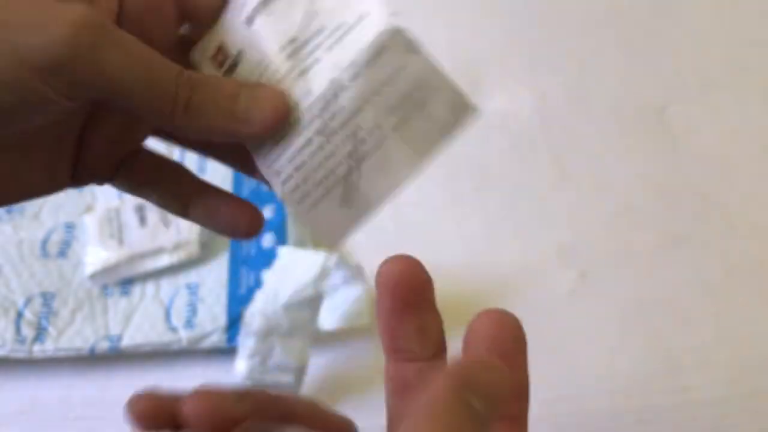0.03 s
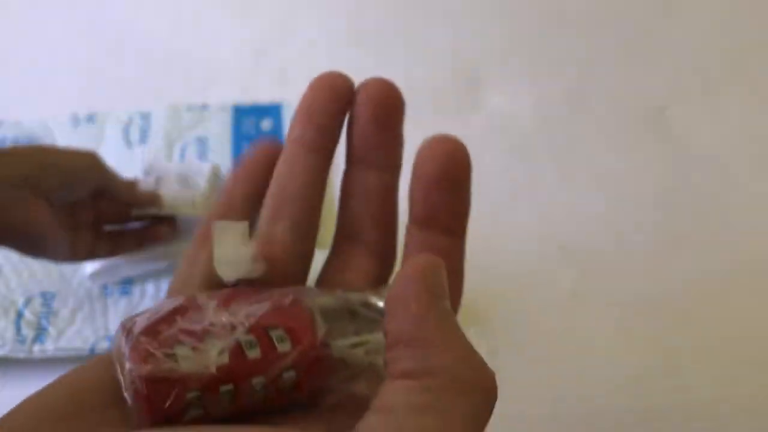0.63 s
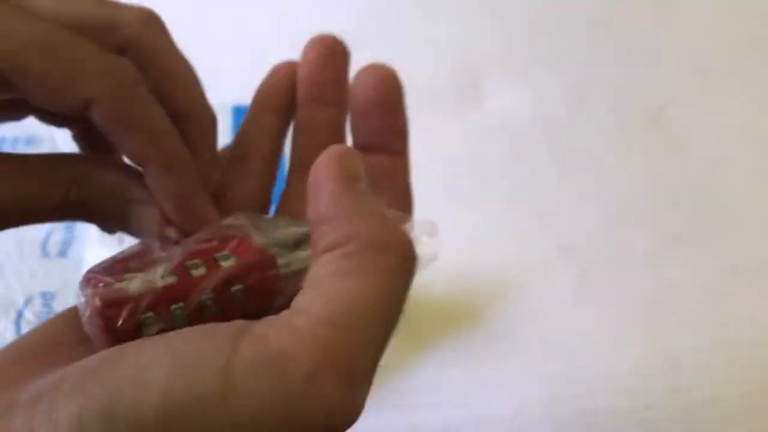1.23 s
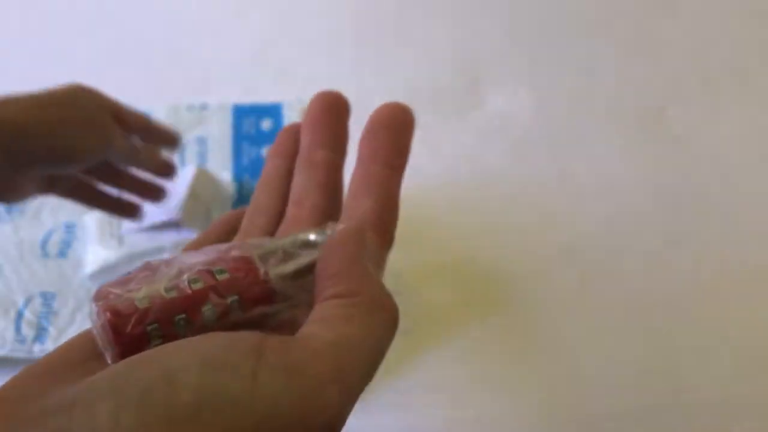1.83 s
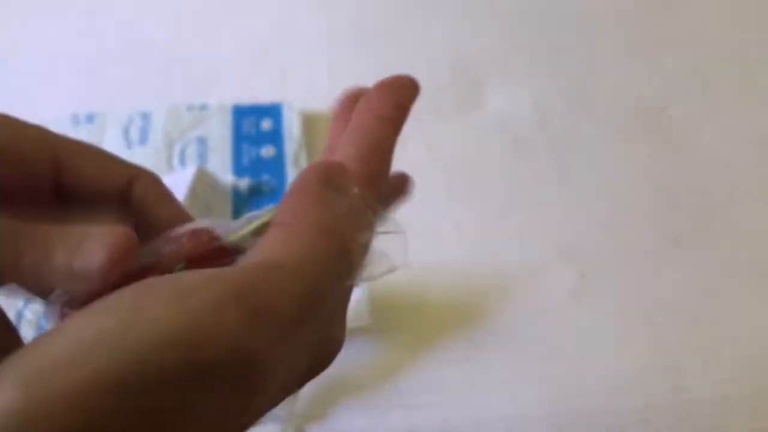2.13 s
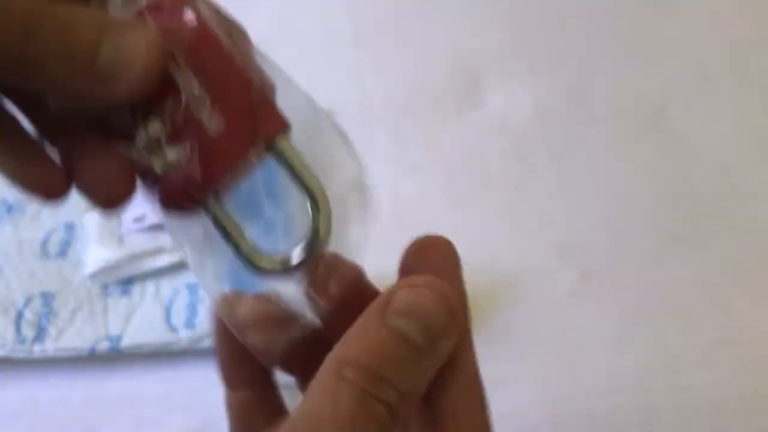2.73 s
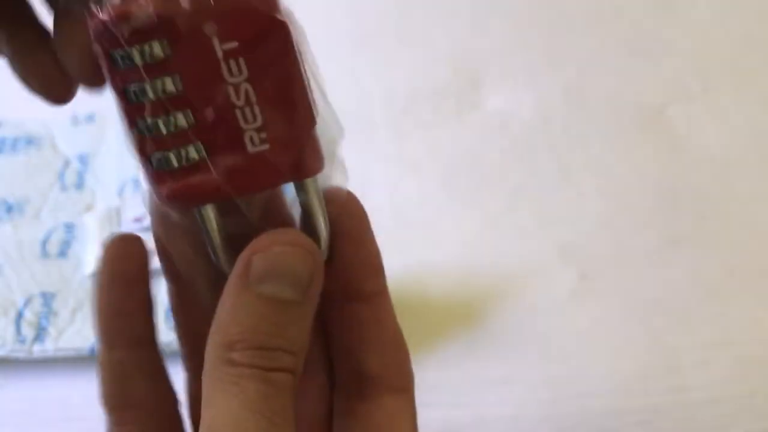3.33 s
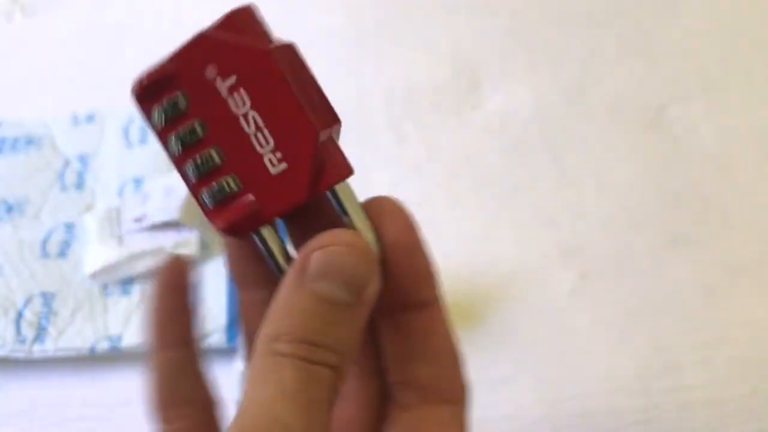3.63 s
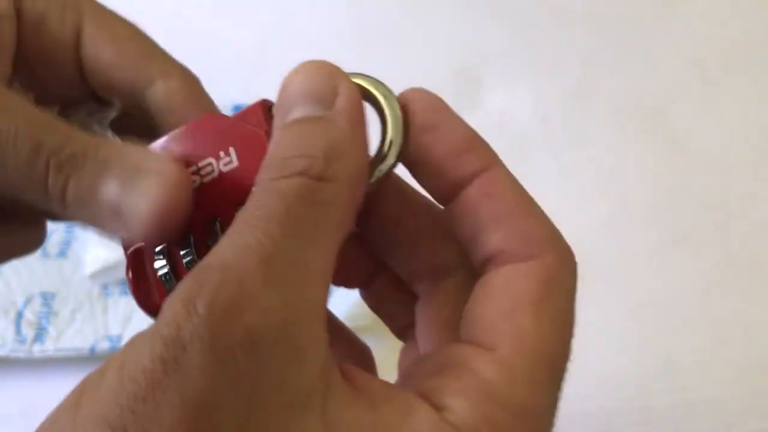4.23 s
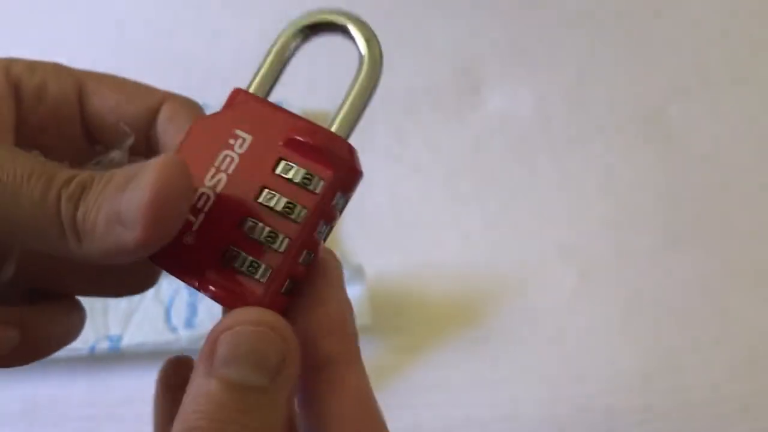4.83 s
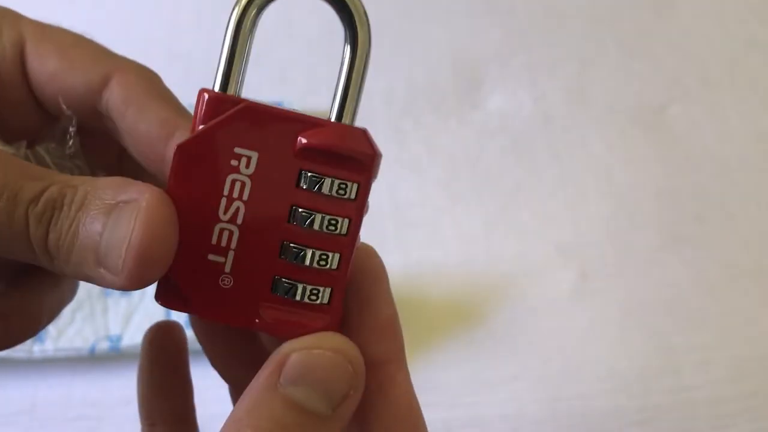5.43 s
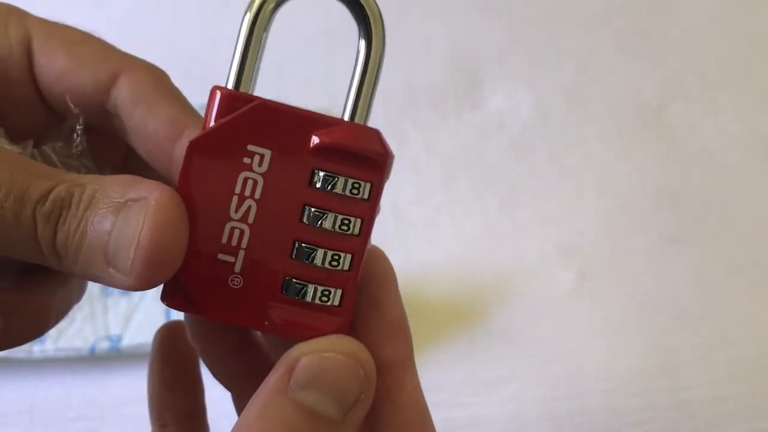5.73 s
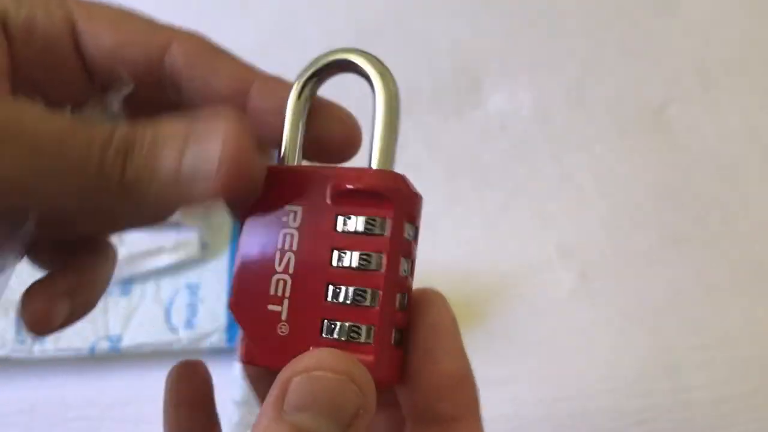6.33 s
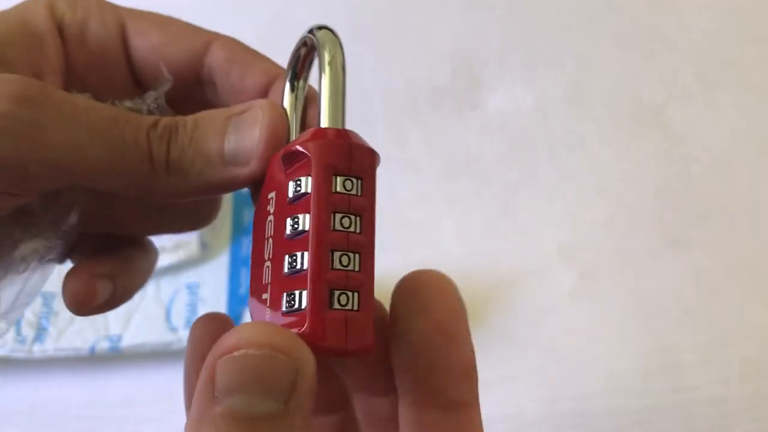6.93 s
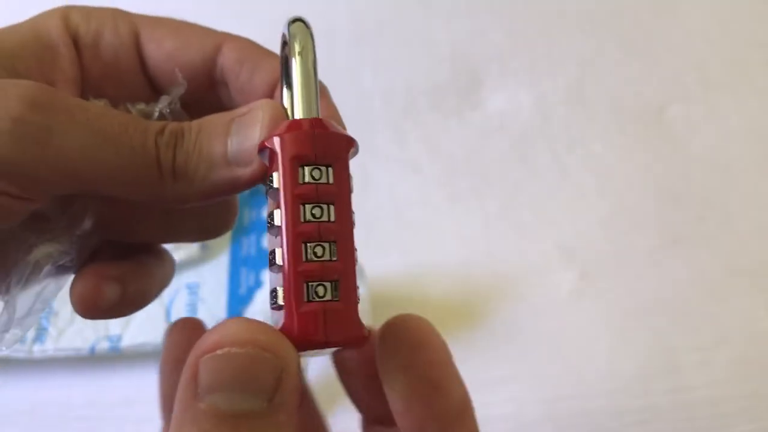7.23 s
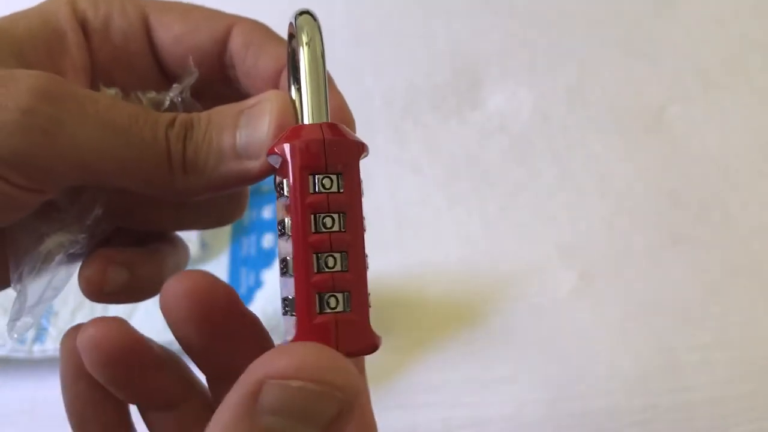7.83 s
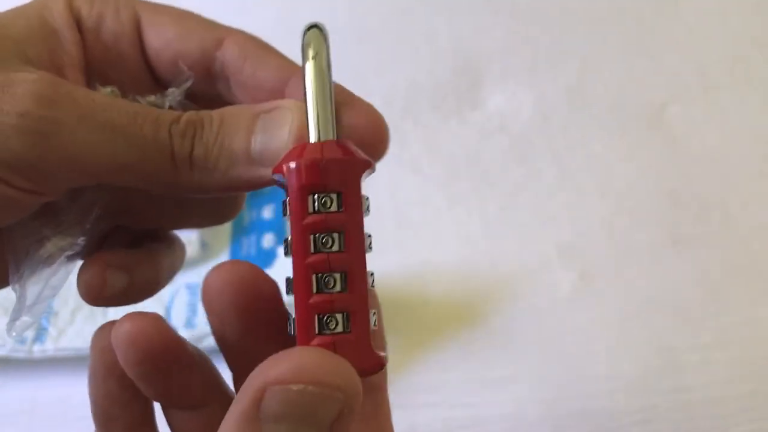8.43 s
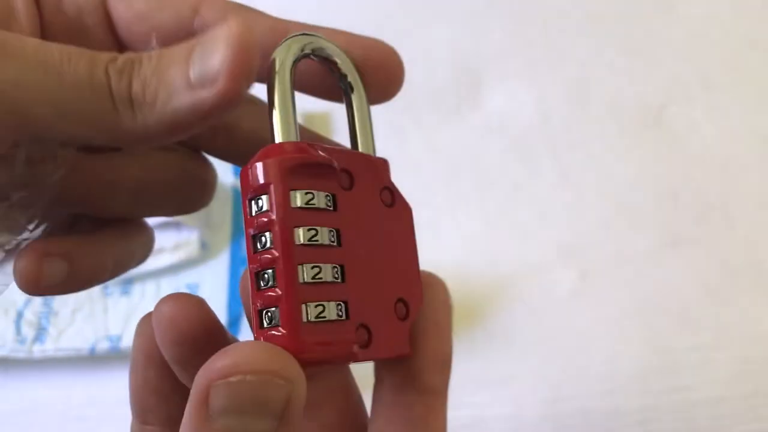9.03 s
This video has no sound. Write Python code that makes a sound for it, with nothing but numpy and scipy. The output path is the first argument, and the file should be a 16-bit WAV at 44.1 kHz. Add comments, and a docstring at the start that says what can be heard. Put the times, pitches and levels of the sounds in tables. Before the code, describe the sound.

Thin plastic crackles in short bursts close to the microphone, just above a table. The crinkling grows thicker and louder as hands tug the wrapping off a padlock, then dies down as it is balled up in one hand. Sparse, quieter crackles, light clicks of the lock and soft finger taps follow while the lock is handled, over the faint low background of a small room.

```python
"""A small quiet room, microphone close above a table: hands pull a thin plastic wrapper off a padlock.
The film buckles in swarms of tiny creases, densest while it slides off the lock; afterwards it crackles
now and then in the fist while fingers turn the lock over. Large creases snap, the lock ticks, fingertips
knock softly. The table gives each snap a quick echo; faint walls and a low room tone lie behind."""
import sys
import numpy as np
from scipy import signal
from scipy.fft import rfft, irfft
from scipy.io import wavfile
from scipy.ndimage import uniform_filter1d

SR = 44100
rng = np.random.default_rng(int(sys.argv[2]) if len(sys.argv) > 2 else 0)


def digitize_waveform(pressure):
    """Quantize a signal to 16-bit integers and store it at the path in sys.argv[1].

    Rows of a 2-D input are taken as channels; values are limited to [-1, 1].
    """
    field = np.atleast_2d(pressure).T
    bounded = np.clip(field, -1, 1)
    quanta = np.round(bounded * 32767).astype(np.int16)
    wavfile.write(sys.argv[1], SR, quanta)


N = 405719
TIME = np.arange(N) / SR

# Finger strokes that pick, pull, ball up and squeeze the film: (start [s], length [s], crisp level [dB])
STROKES = [ (0.024, 0.05, -45), (0.139, .04, -45.5), (0.2, 0.14, -52), (0.346, 0.019, -39.5),
           (0.387, .14, -53), (0.654, 0.048, -58), (.71, 0.16, -66.5), (0.868, .012, -57.5),
           (1.054, .13, -71.5), (1.224, 0.032, -46), (1.274, 0.11, -55), (1.44, 0.036, -54),
           (1.513, .17, -51), (1.724, 0.024, -42.5), (1.777, 0.11, -46), (1.92, 0.22, -49),
           (2.177, 0.25, -43.5), (2.279, 0.26, -36.5), (2.579, 0.16, -34.5), (2.76, 0.12, -42.5),
           (2.9, .07, -48), (2.975, 0.021, -35), (3.027, 0.15, -40), (3.145, 0.148, -33.5),
           (3.302, 0.15, -39), (3.471, 0.054, -32), (3.553, 0.12, -40), (3.718, 0.18, -45),
           (3.919, .22, -41), (4.195, 0.081, -44), (4.317, .04, -52.5), (4.425, 0.098, -49.5),
           (4.545, 0.23, -60.5), (4.826, 0.048, -52), (5.052, 0.12, -55.5), (5.23, 0.092, -64.5),
           (5.402, 0.038, -67), (6.171, 0.087, -65.5), (6.344, 0.056, -53), (6.406, 0.23, -65.5),
           (6.638, 0.11, -69.5), (6.832, 0.29, -66), (7.284, 0.019, -61.5), (7.364, 0.21, -73.5),
           (8.188, 0.071, -61), (8.403, .16, -61.5), (8.633, .11, -52.5), (8.769, 0.12, -52.5),
           (8.945, 0.16, -62.5)]
# Tugs that jerk the whole sheet: (time [s], flex level [dB])
TUGS = [(.03, -58), (.36, -69), (.672, -57.5), (2.483, -44), (2.968, -41.5), (3.5, -46), (3.621, -47.5)]
# Film snaps and lock ticks: (time [s], level over 3 ms [dB], body relative to crisp band [dB], ring [Hz])
SNAPS = [(0.0347, -32.5, -4, 2400), (0.048, -29.5, 4, 2700), (0.315, -33, -10.5, 4500),
         (0.369, -35.5, 6, 3020), (0.403, -38, 5, 2400), (0.5017, -40, 0.5, 2100), (0.6433, -33, -4, 2760),
         (0.6763, -39, 6, 2660), (1.297, -40, -13, 3400), (1.319, -41, -25, 3600), (1.37, -37, 2.5, 2520),
         (1.4551, -36.5, -9, 2680), (1.47, -29.5, -0.5, 3240), (1.63, -31.5, -7, 2830),
         (1.6525, -38, -25, 4000), (1.95, -37, -22.5, 2900), (1.9565, -35.5, 0.5, 3500),
         (2.1155, -33, -2, 4300), (2.1798, -32, -1, 1430), (2.1852, -23, -14, 3460),
         (2.4345, -27.5, -7, 3500), (2.567, -18, -10.5, 4350), (2.6052, -27.5, -21, 3700),
         (2.69, -31.5, -1, 4460), (2.726, -25, -2, 4000), (2.7987, -31, -6, 3170), (2.815, -32, -17, 4200),
         (2.8355, -30, -4, 3420), (2.9674, -25, -6, 1090), (3.1446, -29, -12, 3700),
         (3.4083, -34, -4, 3940), (3.498, -25.5, -6, 3600), (3.8896, -31, 28, 4100), (3.9172, -28, 7, 3730),
         (4.059, -33, 15, 4700), (4.2179, -33, 3, 4240), (4.287, -34.5, -21, 2240),
         (4.418, -40.5, -13, 2250), (4.6251, -43.5, -11, 3400), (4.683, -40.5, -1, 2170),
         (4.8047, -39, -9, 2120), (4.8514, -39.5, 10, 2910), (5.2898, -45, -7, 3550),
         (5.3422, -46.5, 3, 1760), (5.5696, -35, 4.5, 2160), (5.6744, -50, -3, 3440),
         (6.2264, -56, 10.5, 2100), (6.3445, -40, -0.5, 4460), (6.3765, -37, -5, 4700),
         (6.4803, -50.5, 8, 3440), (6.655, -55, 2, 3000), (6.843, -48, -1, 3400),
         (6.8662, -35.5, 7.5, 3940), (6.9784, -44.5, -6, 2200), (7.0155, -50.5, -17, 3400),
         (7.0585, -45.5, -2, 3720), (7.0718, -43, 13, 3400), (7.1668, -51, 7, 2630),
         (7.1885, -42.5, 3.5, 2900), (7.3, -45, -7, 3640), (7.4195, -58, -8, 3400),
         (7.7398, -47.5, -1.5, 3470), (8.204, -44, -7, 3770), (8.3868, -46.5, 13, 3100),
         (8.3956, -43.5, -7, 2780), (8.4545, -38.5, 9.5, 2890), (8.687, -36.5, 3.5, 2820),
         (8.7356, -34, 11, 2950), (8.8584, -36.5, 7, 2830), (8.8687, -36, 6, 2900),
         (9.037, -42, -1.5, 2870)]
# Fingertips landing on lock and wrapper: (time [s], level over 10 ms [dB], pitch [Hz], decay [s])
KNOCKS = [(.669, -52, 312, 0.011), (1.752, -53, 980, 0.0021), (3.505, -46, 91, .03),
          (3.517, -47, 313, 0.0078), (3.545, -42, 97, 0.024), (4.43, -50, 2030, 0.0017),
          (6.866, -62, 780, 0.0052), (6.881, -59.5, 674, 0.0024), (6.934, -60.5, 950, 0.0026)]
# Spectra at the microphone: (frequency [Hz], relative level [dB])
CRISP_COLOUR = [(3800, -25), (4900, -11.5), (6000, -2.5), (6800, -3), (7600, -5), (8800, -1.5),
                (9600, -3.5), (10400, -11), (12000, -21)]  # tiny creases
AIR_COLOUR = [(9000, -30.5), (10400, -5.5), (11300, 5.5), (13000, 1.5), (15800, -11)]  # their top sheen
BODY_COLOUR = [(300, -19.5), (750, -4.5), (1300, -1), (1900, -3), (2700, -2.5), (3900, 0.5), (4900, -7),
               (6500, -39)]  # larger folds
FLEX_COLOUR = [(45, -11.5), (90, 1.5), (180, 0.5), (340, 3.5), (470, -4), (850, 1), (1400, -0.5),
               (3000, -40)]  # the whole sheet flexing
ROOM_COLOUR = [(20, -43.5), (35, -16), (55, 1.5), (75, -5), (97, -1), (140, -6.5), (230, -15), (450, -23),
               (1000, -27), (3000, -32), (9000, -39.5), (16000, -36)]  # room tone
# Balance as the film loosens: (taut level [dB], slack level [dB])
BODY_DB, FLEX_DB, SNAP_AIR_DB = (-5.5, -1.5), (-18.5, -23.5), (1, -1.5)  # relative to the crisp band
HOLLOW_DB = (-18, 7.5)  # gain of the hollow's ring on the folds
# The hollow of hand and wrapper: (centre [Hz], width [Hz])
OPEN_HOLLOW, CLOSED_HOLLOW = (3900, 1700), (2900, 1100)

OFF_S, SLACKEN_S, FIST_CLOSES_S = 3.29, 0.41, 4.3  # the film comes off, goes slack, is shut in the fist


def crinkle(gentle_below_db=-46):
    """The film, close up: the harder it is worked, the more creases flip, until they merge into hiss."""
    crisp_db = effort()
    # on taut film, gentle strokes bend more than they crack and leave the hollow free to ring
    gentle_db = np.maximum(gentle_below_db - crisp_db, 0) * slack(TIME, (1, 0))
    body_db = crisp_db + slack(TIME, BODY_DB) + 0.3478 * gentle_db
    hollow_db = slack(TIME, HOLLOW_DB) + 0.75 * gentle_db
    flex_db = crisp_db + slack(TIME, FLEX_DB) + 0.46 * gentle_db
    for start, db in TUGS:
        flex_db = np.maximum(flex_db, gesture(start, db, length_s=0.018, release_db_per_s=279.5))
    slip = bursts(per_s=80)  # the film sticks and gives way
    rate = np.minimum(340 * undb(0.7 * (crisp_db + 45.5) + 2.5 * slip), 1900)
    # skin sliding on the film keeps a faint hiss going between the creases
    hiss = (undb(-44.5) + undb(-12.5) * rate / 1000) * rng.standard_normal(N)
    swarm = (creases(rate, spread_db=5, runs_per_s=80) + hiss) * undb(0.48 * slip)
    crisp = through(swarm, colour(CRISP_COLOUR) + undb(-3) * colour(AIR_COLOUR))
    # larger folds also flip on their own, with no crisp edge
    folds = undb(6) * creases(rate / 2, spread_db=0.5, runs_per_s=60)
    body = through(swarm + folds, colour(BODY_COLOUR))
    body = body + undb(hollow_db) * hollow(body)
    flex = through(swarm + undb(-18) * rng.standard_normal(N), colour(FLEX_COLOUR, size=2048))
    return (steady(crisp, span_s=0.063) * undb(crisp_db)
            + steady(body, span_s=0.074) * undb(body_db)
            + steady(flex, span_s=0.15) * undb(flex_db))


def creases(rate, spread_db, runs_per_s, count=160):
    """Creases at a rate per second, many small, a few large; the same few facets flip for a while."""
    onsets = np.flatnonzero(rng.random(N) < rate / SR)
    size_draw, sign_draw, facet_draw = rng.random((N, 3))[onsets].T
    sizes = undb(spread_db * np.minimum(-np.log(1 - size_draw), 4.1)) * np.sign(sign_draw - 0.5)
    facets = np.array([buckle(settle_s=0.00032, shiver=0.74, ring=0.62, ring_s=0.00061, echo=0.33)
                       for _ in range(count)])
    which = (onsets / SR * runs_per_s + 5 * facet_draw).astype(int) % count
    pushes = facets[which] * sizes[:, None]
    samples = onsets[:, None] + np.arange(pushes.shape[1])
    return np.bincount(samples.ravel(), pushes.ravel(), N)[:N]


def buckle(settle_s, shiver, ring, ring_s, echo, size=320):
    """One crease flips: a crack, a shiver of the film, a brief ring of its facet, a table echo."""
    t = np.arange(size) / SR
    hz = np.exp(rng.uniform(np.log(1800), np.log(13000)))
    settling = np.exp(-t / settle_s) + 0.03 * np.exp(-t / 0.0014)
    push = shiver * unit(rng.standard_normal(size) * settling)
    push += ring * unit(np.sin(2 * np.pi * hz * t) * np.exp(-t / ring_s * np.sqrt(hz / 5000)))
    push[0] += 1  # the crack
    table_lag = int(rng.uniform(0.0017, 0.0032) * SR)
    push[table_lag:] += echo * push[:-table_lag]
    return unit(push)


def effort(resting_db=-80.0):
    """How hard the film is worked, in dB: the strongest stroke, or a slight creep when held still."""
    db = np.full(N, resting_db)
    for start, length_s, level_db in STROKES:
        db = np.maximum(db, gesture(start, level_db, length_s, release_db_per_s=380.5))
    return db


def gesture(start, db, length_s, release_db_per_s, attack_db_per_s=1096.5):
    """Level in dB of one move of the fingers: attack, hold, release."""
    before_s = np.maximum(start - TIME, 0)
    after_s = np.maximum(TIME - start - length_s, 0)
    return db - attack_db_per_s * before_s - release_db_per_s * after_s


def slack(time_s, pair):
    """Go from the taut value to the slack one as the film leaves the lock."""
    return np.interp(time_s, [OFF_S, OFF_S + SLACKEN_S], pair)


def hollow(x):
    """The hollow of hand and wrapper rings, wavering with the fingers; it opens as the film comes off."""
    waver = undb(0.92 * bursts(per_s=40))
    wide, narrow = (resonate(x, hz * waver, width_hz) for hz, width_hz in (OPEN_HOLLOW, CLOSED_HOLLOW))
    return np.where((TIME > OFF_S) & (TIME < FIST_CLOSES_S), wide, narrow)


def snaps(ring_s=0.002, ring_db=0.5, forerunner_s=0.003, forerunner_db=-19.5, size=512):
    """Single large creases and ticks of the lock ring briefly, with more sheen while the film is taut."""
    out, t = np.zeros(N), np.arange(size) / SR
    bands = [colour(points) for points in (BODY_COLOUR, CRISP_COLOUR, AIR_COLOUR)]
    bands[0] = np.diff(bands[0], prepend=0)  # one small facet radiates its lows poorly
    for start, db, body_db, hz in SNAPS:
        push = buckle(settle_s=0.00023, shiver=1.0, ring=0.58, ring_s=0.0003, echo=0.17, size=size)
        body, crisp, air = (unit(through(push, band)) for band in bands)
        # only the larger, lower facets carry a strong upper mode
        upper = np.clip(2 - hz / 2200, 0, 1) * np.sin(2 * np.pi * 2.04 * hz * t)
        ring = unit((np.sin(2 * np.pi * hz * t) + upper) * np.exp(-t / ring_s))
        ringing_body = unit(body + undb(ring_db) * ring)
        snap = undb(body_db) * ringing_body + crisp + undb(slack(start, SNAP_AIR_DB)) * air
        gain = undb(db) * np.sqrt(0.003 * SR)
        add(out, start, unit(snap) * gain)
        # a smaller crease gives way just before each snap
        forerunner = unit(undb(body_db) * body + crisp) * gain * undb(forerunner_db)
        add(out, start - forerunner_s * rng.uniform(0.42, 1), forerunner)
    return out


def knocks(rise_s=0.0014, size=6000):
    """A fingertip lands near the microphone: a soft ring that the hand damps at once."""
    out, t = np.zeros(N), np.arange(size) / SR
    for start, db, hz, decay_s in KNOCKS:
        ring = np.sin(2 * np.pi * hz * t) * np.exp(-t / decay_s) * (1 - np.exp(-t / rise_s))
        add(out, start, unit(ring) * undb(db) * np.sqrt(0.01 * SR))
    return out


def walls(x, wet_db, t60_s, size=16384):
    """Farther off, the walls answer: faint, late and slightly duller."""
    t = np.arange(size) / SR
    envelope = np.exp(-np.log(1000) * t / t60_s) * np.clip(t / 0.0009, 0, 1)
    dulling = colour([(200, 3.0), (4000, 3.5), (9000, 0.0), (16000, -33.5)])
    tail = through(rng.standard_normal(size) * envelope, dulling)
    return undb(wet_db) * through(x, unit(tail))


def room_tone(level_db):
    """All around the microphone, a low indoor rumble under a thin even hiss."""
    return undb(level_db) * through(rng.standard_normal(N), colour(ROOM_COLOUR, size=8192))


def bursts(per_s):
    """A random wander around zero, gliding between per_s new values a second."""
    knots = rng.standard_normal(N // 100)
    return 0.85 * np.interp(TIME * per_s, np.arange(len(knots)), knots)


def resonate(x, hz, width_hz):
    """A resonance whose centre moves: shift the centre to zero, smooth, shift back."""
    turn = np.exp(2j * np.pi * np.cumsum(hz) / SR)
    pole = np.exp(-np.pi * width_hz / SR)
    return 2 * np.real(turn * signal.lfilter([1 - pole], [1, -pole], x / turn))


def colour(points, size=512):
    """Minimum-phase impulse response with the given spectral shape and an energy of one."""
    hz, db = np.transpose(points)
    bin_hz = np.maximum(np.arange(size // 2 + 1) * SR / size, 1)
    gains = undb(np.interp(np.log(bin_hz), np.log(hz), db))
    cepstrum = irfft(np.log(gains))
    cepstrum[1:size // 2] *= 2
    cepstrum[size // 2 + 1:] = 0
    return unit(irfft(np.exp(rfft(cepstrum))))


def steady(x, span_s):
    """Hold the short-term rms at one; single clicks keep their shape."""
    span = int(span_s * SR)
    power = uniform_filter1d(uniform_filter1d(x ** 2, span), span)
    return x / np.sqrt(np.abs(power) + 1e-12)


def through(x, response):
    """Pass a sound through an impulse response."""
    return signal.oaconvolve(x, response)[:len(x)]


def add(out, start_s, sound):
    """Mix a sound in at its start time."""
    i = max(int(start_s * SR), 0)
    out[i:i + len(sound)] += sound[:N - i]


def unit(x):
    """Scale to an energy of one."""
    return x / np.sqrt(np.sum(x ** 2) + 1e-18)


def undb(db):
    """Decibels to gain."""
    return 10 ** (np.asarray(db) / 20)


def scene():
    """One microphone: wrapper and lock close by, the room far behind."""
    near = crinkle() + snaps() + knocks()
    return (near + walls(near, wet_db=-19.5, t60_s=0.24) + room_tone(level_db=-62))[None]


def record(dry):
    """The recorder cuts the rumble below 30 Hz and the top above 15.9 kHz."""
    low_cut = signal.butter(2, 30, "high", fs=SR, output="sos")
    high_cut = signal.ellip(10, 0.1, 80, 15900, fs=SR, output="sos")
    return signal.sosfilt(high_cut, signal.sosfilt(low_cut, dry))


dry = scene()
out = record(dry)
digitize_waveform(out)
```